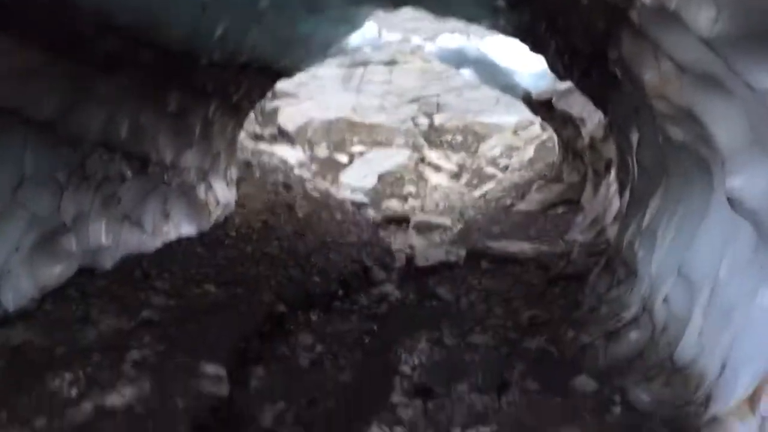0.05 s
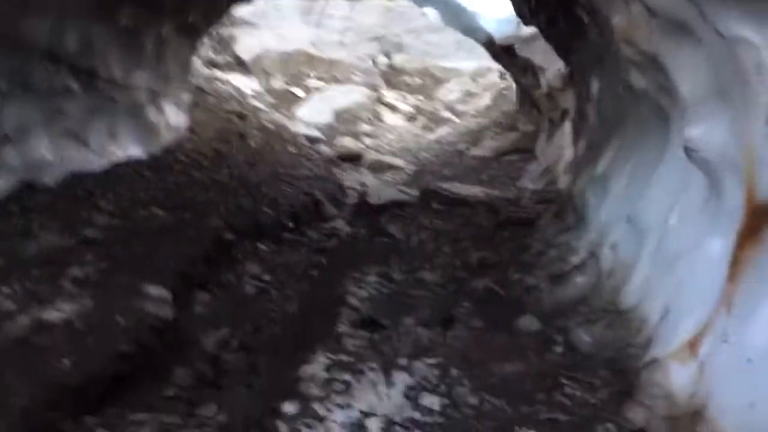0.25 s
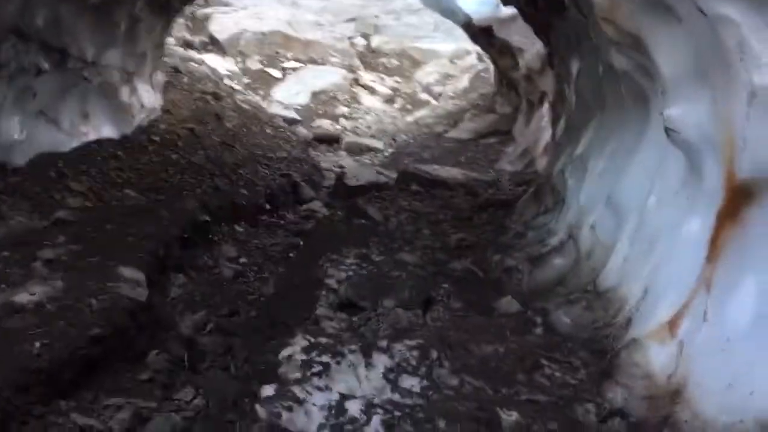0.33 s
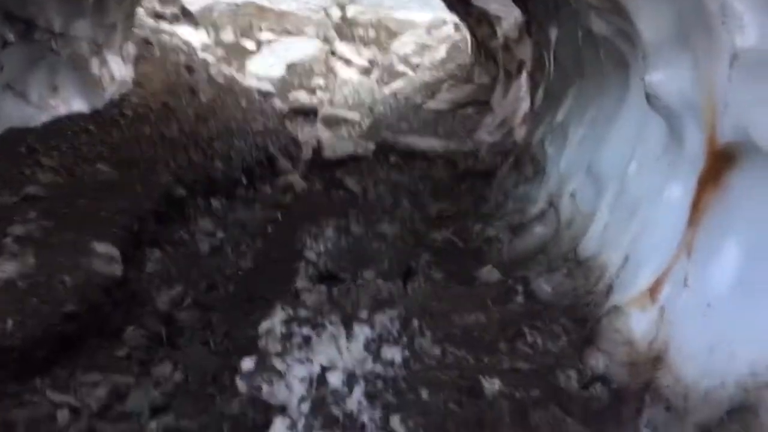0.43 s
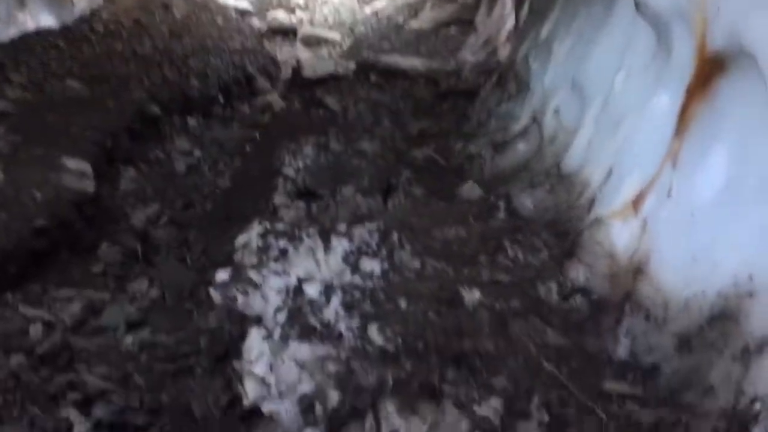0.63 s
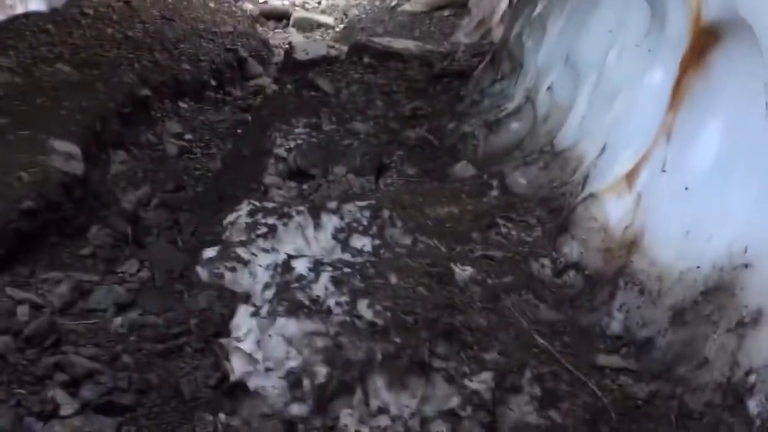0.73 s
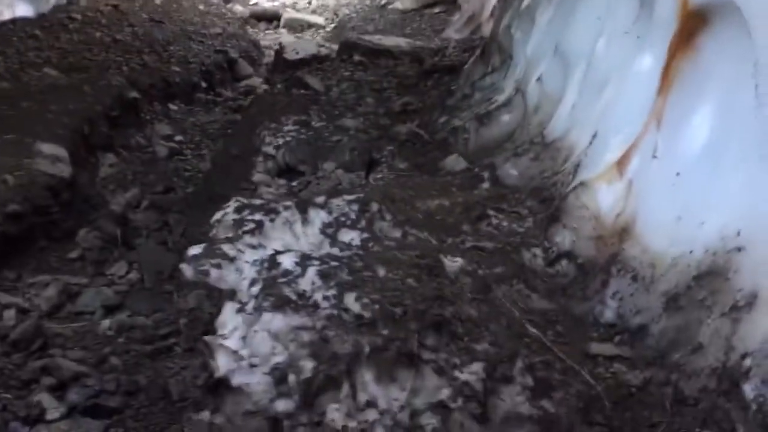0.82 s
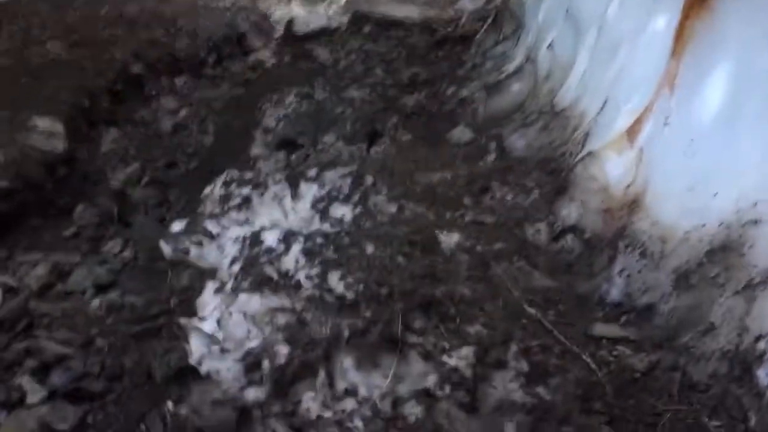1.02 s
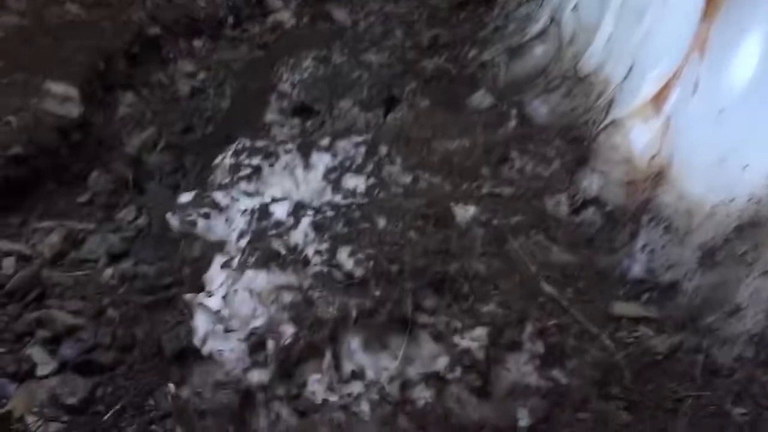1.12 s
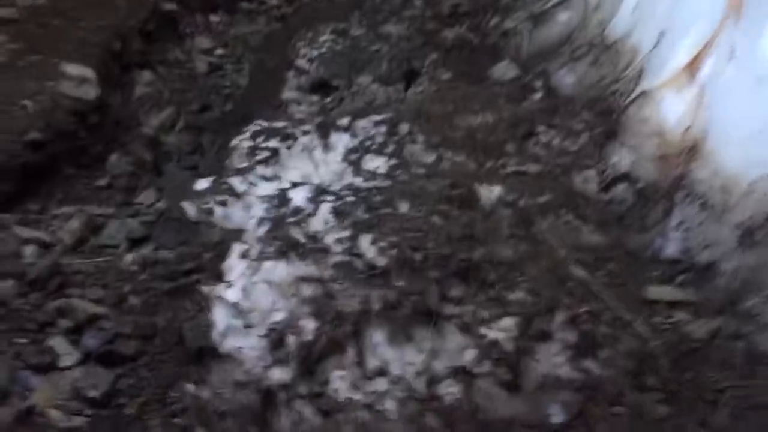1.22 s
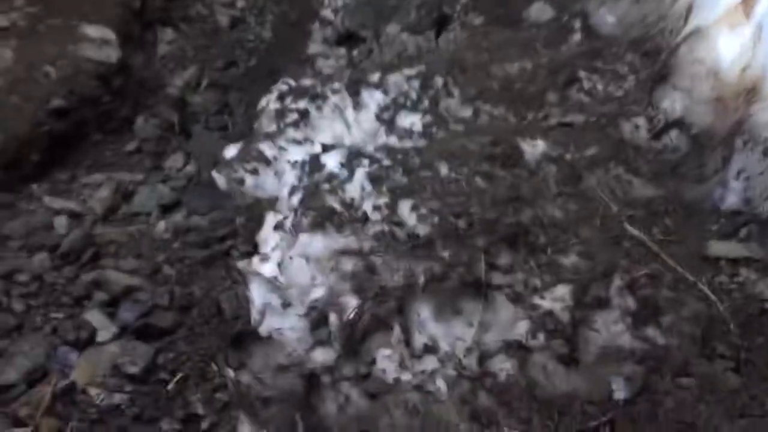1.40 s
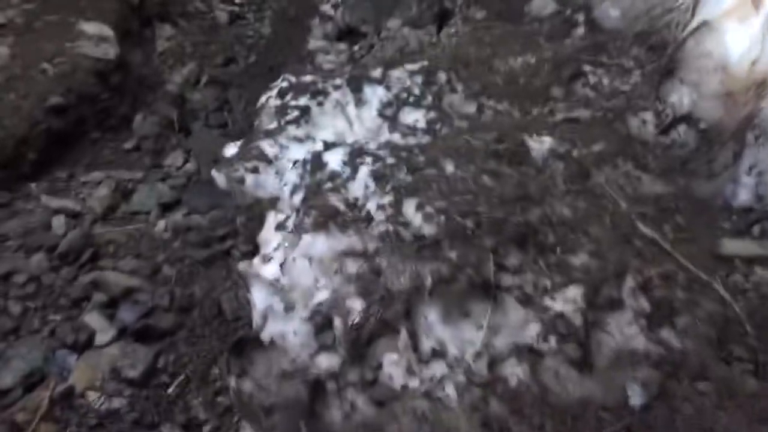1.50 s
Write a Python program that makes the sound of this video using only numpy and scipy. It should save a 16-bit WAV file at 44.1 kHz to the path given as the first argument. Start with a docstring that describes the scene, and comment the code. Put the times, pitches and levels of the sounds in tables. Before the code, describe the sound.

Meltwater dripping and splashing in a cave as boots step twice on wet gravel.

```python
"""Drips and steps in an ice cave

Meltwater drips onto gravel: each drop traps a bubble that pings, and throws a little spray.
In two steps, boots set the ground thudding and crunch the gravel; one stone knocks on another.
The ice walls reverberate briefly, over far drips, a wash of trickling water and a faint hollow tone."""
import sys
import numpy as np
from scipy import signal
from scipy.io import wavfile
from scipy.ndimage import uniform_filter1d

SR = 44100
rng = np.random.default_rng(int(sys.argv[2]) if len(sys.argv) > 2 else 0)


def digitize_waveform(pressure):
    """Quantize a signal to 16-bit integers and store it at the path in sys.argv[1].

    Rows of a 2-D input are taken as channels; values are limited to [-1, 1].
    """
    field = np.atleast_2d(pressure).T
    bounded = np.clip(field, -1, 1)
    quanta = np.round(bounded * 32767).astype(np.int16)
    wavfile.write(sys.argv[1], SR, quanta)


N = 68355

# near drops: (time [s], level [dB], ping pitch [Hz], ping gain [dB], spray gain [dB],
# ping decay [s], spray decay [s])
NEAR_DROPS = [(0.0034, -47.5, 3280, -6, -4, 0.0016, 0.00095),
              (0.0152, -56, 4560, 9.5, -5.5, 0.0012, 0.0012),
              (0.0628, -35.5, 6360, -12, -12, 0.0009, 0.0013), (0.0653, -40, 13900, 0, -18, 0.0009, 0.0017),
              (0.1587, -44, 14000, 1, 2.5, 0.00099, 0.00053), (0.182, -41, 2490, -9.5, -2, 0.0025, 0.0014),
              (0.2704, -25, 4030, -3.5, -18.5, 0.0016, 0.0029),
              (0.5046, -38, 8500, -1, -14, 0.00083, 0.0012), (0.5356, -34.5, 2740, 0, -12, 0.00062, 0.0016),
              (0.5488, -26.5, 3470, 2.5, -10.5, 0.00035, 0.0025),
              (0.5708, -43, 7200, -11, -3, 0.0008, 0.0024),
              (0.5923, -18.5, 8530, -3.5, -13.5, 0.00059, 0.0014),
              (0.6066, -25, 6040, -4, -12.5, 0.00037, 0.0024),
              (0.7132, -37, 13300, -7, -9, 0.00067, 0.0014),
              (0.7193, -36.5, 3710, -7.5, -4, 0.0027, 0.0013), (0.754, -53, 4670, -15, 5, 0.00083, 0.0013),
              (0.7776, -30, 6940, 5, -13, 0.00056, 0.0023), (0.8653, -39.5, 5700, -5, -1, 0.0012, 0.00072),
              (0.9675, -28.5, 2340, -4, -6.5, 0.0013, 0.0018),
              (1.0215, -28.5, 5560, 1.5, -11, 0.00048, 0.0018),
              (1.082, -35, 3780, -3, -8.5, 0.0009, 0.0019), (1.0923, -34.5, 5900, -3, -10, 0.001, 0.0022),
              (1.1205, -42.5, 2890, -14, -8, 0.00058, 0.0044),
              (1.1586, -32.5, 8600, -1, -21.5, 0.00044, 0.0034),
              (1.1906, -36.5, 4050, -7, -9, 0.0027, 0.0035), (1.1996, -32, 5620, -4, -7, 0.0016, 0.0033),
              (1.283, -30.5, 3730, -6.5, -10, 0.0027, 0.0024),
              (1.295, -27, 8170, -12, -10.5, 0.00052, 0.002), (1.3243, -35, 3650, -15, -5, 0.0006, 0.0014),
              (1.332, -29, 3250, -3, -14, 0.00068, 0.0014), (1.337, -33, 3500, -1.5, -9, 0.00052, 0.0015),
              (1.3973, -44, 12300, 3, 0.5, 0.00098, 0.0019),
              (1.4187, -33.5, 2580, -5.5, -4.5, 0.0009, 0.0014),
              (1.4257, -31, 12950, -0.5, -16, 0.0006, 0.0022),
              (1.4506, -32.5, 8850, -1, -5.5, 0.00076, 0.0016),
              (1.5097, -29, 4040, -4, -5.5, 0.001, 0.0017)]
# spray spectrum: (frequency [Hz], level [dB])
SPRAY_SPECTRUM = [(200, -10), (1200, -18), (2200, -5.5), (4000, 4.5), (6000, 5.5), (8500, 4), (10500, 1),
                  (13500, 1), (16000, 1)]
# boot impacts: (time [s], level [dB], pitch [Hz], decay [s], upper mode gain [dB], boom gain [dB])
BOOT_IMPACTS = [(.198, -27.5, 181, 0.0071, -6.5, -31), (.229, -36, 126, 0.0089, -2.5, -32),
                (.252, -30.5, 140, 0.014, -9.5, -40), (.281, -36.5, 128, 0.019, -21, -32),
                (0.347, -33.5, 186.7, 0.029, -8, -19), (.368, -40.5, 193.2, 0.02, -2, -2.5),
                (0.892, -41, 198.7, 0.03, -6.5, -1), (1.147, -54, 112, 0.024, -14, -0.5)]
# gravel crushed: (time [s], level [dB], rise [s], decay [s], tilt [dB/octave], cutoff [Hz])
GRAVEL_CRUSHES = [(0.191, -47.5, 0.005, 0.0056, 0, 4960), (.245, -47.5, 0.01, 0.058, -5.5, 5000),
                  (.35, -38.5, 0.0096, 0.019, -2.5, 3550), (.368, -33.5, 0.0031, 0.034, -1.5, 5960),
                  (.892, -28.5, 0.0034, .016, -1, 16000), (.932, -40.5, 0.0077, 0.022, -0.5, 14000),
                  (1.334, -44, 0.0013, 0.022, 5.5, 7600)]
# wet gravel spectrum: (frequency [Hz], level [dB])
GRAVEL_SPECTRUM = [(40, -11), (190, 2.5), (280, 2.5), (400, -4.5), (520, 0.5), (760, -6), (1080, 0.5),
                   (1350, 0), (1700, -0.5), (2300, -0.5), (4000, -3.5), (6500, -6), (10000, -11),
                   (16000, -15)]
# a stone clack, then a late, low drip-like ping: (time [s], level [dB], pitch [ratio], echo gain [dB])
CLACK_AND_PING = [(.3645, -11, 0.96, -1.5), (1.513, -35, 0.592, -11.5)]
# modes of both at a pitch ratio of one: (frequency [Hz], level [dB], t60 [s])
CLACK_AND_PING_MODES = [(2480, -6, 0.0047), (3450, -12, 0.009), (3860, 7, 0.0024), (5750, -19, 0.009)]
# grit shifting under the sole: (time [s], level [dB])
GRIT_LEVEL = [(0, -69.5), (0.751, -76.5), (.95, -56), (1.08, -56.5), (1.2, -56), (1.3, -57), (1.4, -64.5),
              (1.55, -68)]
# grit spectrum: (frequency [Hz], level [dB])
GRIT_SPECTRUM = [(40, -24), (180, 6), (450, -4), (900, -1.5), (1900, 6.5), (2900, -2.5), (4300, -1),
                 (7000, -25), (16000, -34)]
# envelope of the far drops: (time [s], gain [dB])
FAR_GAIN = [(0, -3.5), (.05, -6), (0.091, -20.5), (.15, -10), (.18, -5), (0.301, 6.5), (.4, 4), (.56, 0.5),
            (.67, -7), (.83, -11), (1.1, -2.5), (1.251, -8), (1.36, -8.5), (1.45, -6), (1.55, -18)]
# trickling water spectrum: (frequency [Hz], level [dB])
WATER_SPECTRUM = [(25, 8), (60, 7.5), (160, 5.5), (320, 5.5), (500, -1), (1000, -0.5), (2000, -6.5),
                  (4500, -9), (8000, -9.5), (16000, -7.5)]
# hollow tone: (time [s], pitch [Hz], level [dB])
HOLLOW_TONE = [(.62, 331.4, -102), (.69, 331.7, -65), (.75, 310.4, -78), (0.801, 322.7, -56),
               (.85, 248, -73), (.9, 226, -55)]
# reverberation time: (frequency [Hz], t60 [s])
ECHO_T60 = [(60, 0.82), (250, .48), (700, 0.42), (1800, 0.53), (4500, 0.314), (8000, 0.36), (15000, 0.46)]
# echo spectrum: (frequency [Hz], level [dB])
ECHO_SPECTRUM = [(40, 0), (120, 2), (250, -8), (450, 2), (1500, -5), (4000, 0), (8000, -4), (15000, -5)]
# resonances of the cave air: (frequency [Hz], level [dB], t60 [s])
AIR_MODES = [(146, -63, 0.35), (186, -62, 0.53), (295, -64, 0.22), (346, -55.5, .5)]


def drips():
    """Drop impact: each near drop excites a bubble, a spit of spray and a spatter falling back."""
    pings, sprays, t = np.zeros(N), np.zeros(N), seconds(3000)
    ping_delay_s = 0.000897
    for start, db, hz, ping_db, spray_db, ping_decay, spray_decay in NEAR_DROPS:
        add(pings, start + ping_delay_s, amp(db + ping_db) * ping(hz, ping_decay, t))
        spit = grains(len(t), spread_db=8) * burst(t, 0.94 * spray_decay, spray_decay)
        spatter = amp(-13.5) * grains(len(t), spread_db=5) * burst(t, rise_s=0.0053, decay_s=0.006)
        add(sprays, start, amp(db + spray_db) * (spit + spatter))
    sprays = coloured(sprays, SPRAY_SPECTRUM)
    return pings + sprays + cave(amp(-10.5) * pings + amp(-6) * sprays)


def ping(hz, decay_s, t):
    """Bubble resonance: trapped air rings as a damped oscillator, gliding slightly upwards."""
    phase = 2 * np.pi * hz * t * (1 + 1.5 * t)
    return burst(t, rise_s=0.00018, decay_s=decay_s) * np.sin(phase)


def thuds():
    """Modal vibration: the ground under a boot rings in two damped modes, over a slower deep boom."""
    out, t = np.zeros(N), seconds(12000)
    rise_s, upper_ratio, boom_hz = 0.0019, 1.597, 66
    for start, db, hz, decay, upper_db, boom_db in BOOT_IMPACTS:
        body = burst(t, rise_s, decay) * np.sin(2 * np.pi * hz * t)
        upper = burst(t, rise_s, decay_s=0.015) * np.sin(2 * np.pi * upper_ratio * hz * t)
        boom = burst(t, rise_s=0.028, decay_s=0.0069) * np.sin(2 * np.pi * boom_hz * t)
        add(out, start, amp(db) * (body + amp(upper_db) * upper + amp(boom_db) * boom))
    return out


def crunches():
    """Granular noise: wet gravel yields in a dense burst of contacts; the sole muffles the treble."""
    out, t = np.zeros(N), seconds(12000)
    for start, db, rise, decay, tilt, cutoff_hz in GRAVEL_CRUSHES:
        contacts = grains(len(t), spread_db=2.5) * burst(t, rise, decay)
        crush = coloured(contacts, GRAVEL_SPECTRUM, tilt)
        add(out, start, amp(db) * muffled(crush, cutoff_hz))
    return out


def clack_and_ping():
    """Damped modes: a stone clacks underfoot; the same modes, slowed, give a late, low drip-like ping."""
    direct, to_walls, t = np.zeros(N), np.zeros(N), seconds(1500)
    for start, db, ratio, echo_db in CLACK_AND_PING:
        scaled_time = t * ratio
        ringing = amp(db) * ring(CLACK_AND_PING_MODES, scaled_time) * onset(scaled_time, 0.00034)
        add(direct, start, ringing)
        add(to_walls, start, amp(echo_db) * ringing)
    return direct + cave(muffled(to_walls, cutoff_hz=6100))


def grit():
    """Friction noise: grit rustles as the weight rolls over the sole."""
    return coloured(grains(N, spread_db=2.15), GRIT_SPECTRUM) * amp(over_time(GRIT_LEVEL))


def cave(x):
    """Reverberation: close walls give strong early echoes, a tail dying by band and low air modes."""
    t = seconds(32768)
    first_echo_s, early_db, early_decay_s = 0.0055, 5, 0.006
    reflections = rng.choice([-1., 1.], len(t)) * (rng.random(len(t)) < 0.25)
    hz, when, bands = signal.stft(reflections, SR, nperseg=256)
    bands = bands * amp(over_frequency(ECHO_SPECTRUM, hz))[:, None]
    bands *= np.exp(-np.log(1000) * when / over_frequency(ECHO_T60, hz)[:, None])
    tail = signal.istft(bands, SR, nperseg=256)[1][:len(t)]
    tail *= 1 + amp(early_db) * np.exp(-t / early_decay_s)
    response = tail / np.linalg.norm(tail) + ring(AIR_MODES, t)
    out = np.zeros(N)
    add(out, first_echo_s, signal.fftconvolve(x, response))
    return out


def far_drips():
    """Poisson process: small drops fall independently, deeper in the cave."""
    out, t = np.zeros(N), seconds(400)
    drops_per_s, spread_db = 160, 11
    pitches_hz = np.geomspace(3300, 14500, num=24)
    for hz in pitches_hz:
        falls = rng.random(N) < drops_per_s / len(pitches_hz) / SR
        strength = amp(spread_db * np.minimum(rng.exponential(1, N), 2))
        spit = rng.standard_normal(len(t)) * burst(t, rise_s=0.0013, decay_s=0.0016)
        drop = 0.5 * ping(hz, decay_s=0.0015, t=t) + coloured(spit, SPRAY_SPECTRUM)
        out += signal.oaconvolve(falls * strength, drop)[:N]
    return unit_rms(out) * amp(-57.5 + over_time(FAR_GAIN))


def trickle():
    """Amplitude modulation: the broadband noise of distant running water swells slightly."""
    t, rates_hz = seconds(N), np.geomspace(1, 25, num=20)
    swell = sum(np.sin(2 * np.pi * (hz * t + rng.random())) / np.sqrt(hz) for hz in rates_hz)
    return coloured(rng.standard_normal(N), WATER_SPECTRUM) * amp(-67 + 0.5 * unit_rms(swell))


def hollow_tone():
    """Phase modulation: a faint hollow tone wavers as it swells and sinks between the steps."""
    times, hz, db = np.transpose(HOLLOW_TONE)
    t = seconds(N)
    slow_noise = uniform_filter1d(rng.standard_normal(N), size=700)
    waver = unit_rms(uniform_filter1d(slow_noise, size=700))
    phase = 2 * np.pi * np.cumsum(np.interp(t, times, hz)) / SR
    sounding = (t > times[0]) & (t < times[-1])
    return amp(np.interp(t, times, db)) * sounding * np.sin(phase + waver)


def grains(size, spread_db):
    """Granular noise: tiny bursts of random strength, eight samples each."""
    strength = amp(spread_db * np.minimum(rng.exponential(1, size // 8 + 1), 4))
    return unit_rms(rng.standard_normal(size) * np.repeat(strength, 8)[:size])


def ring(modes, t):
    """Free vibration: a sum of damped modes."""
    return sum(amp(db) * np.exp(-np.log(1000) * t / t60) * np.sin(2 * np.pi * hz * t)
               for hz, db, t60 in modes)


def onset(t, rise_s):
    """Sine-squared rise from zero to one."""
    return np.sin(np.pi / 2 * np.clip(t / rise_s, 0, 1)) ** 2


def burst(t, rise_s, decay_s):
    """Exponential decay after a smooth rise."""
    return onset(t, rise_s) * np.exp(-np.maximum(t - rise_s, 0) / decay_s)


def coloured(x, spectrum, tilt=0):
    """Minimum-phase filtering at unit energy, tilted in dB per octave above 300 Hz."""
    hz = abs(np.fft.fftfreq(4096, 1 / SR))
    log_gain = np.log(amp(over_frequency(spectrum, hz) + tilt * np.log2(np.maximum(hz, 300))))
    taps = np.fft.ifft(np.exp(np.conj(signal.hilbert(log_gain)))).real
    return signal.fftconvolve(x, taps / np.linalg.norm(taps))[:len(x)]


def muffled(x, cutoff_hz):
    """Steep low-pass filtering."""
    return signal.sosfilt(signal.butter(6, cutoff_hz, fs=SR, output="sos"), x)


def over_frequency(points, hz):
    """Interpolation on a log-frequency axis."""
    frequencies, values = np.transpose(points)
    return np.interp(np.log(hz + 1), np.log(frequencies + 1), values)


def over_time(points):
    """Linear interpolation across the scene."""
    return np.interp(seconds(N), *np.transpose(points))


def amp(db):
    """Decibels to amplitude ratio."""
    return 10 ** (np.asarray(db) / 20)


def unit_rms(x):
    """Normalisation to an rms of one."""
    return x / np.sqrt(np.mean(x ** 2) + 1e-20)


def seconds(size):
    """Uniformly sampled time axis."""
    return np.arange(size) / SR


def add(mix, start_s, sound):
    """Superposition of a delayed sound on the mix."""
    part = mix[round(start_s * SR):][:len(sound)]
    part += sound[:len(part)]


def scene():
    """Direct and reverberant fields: near drops and steps are in both, far drops only in the echo."""
    thud, crunch = thuds(), crunches()
    step_echo = cave(amp(-11.5) * thud + amp(-4) * crunch)
    near = thud + crunch + step_echo + clack_and_ping() + grit() + drips()
    return (near + cave(far_drips()) + trickle() + hollow_tone())[None]


def record(dry):
    """Band limiting: the microphone cuts the deepest bass, and a low-pass the highest treble."""
    low_hz, high_hz = 48, 15550
    low_cut = signal.butter(3, low_hz, btype="highpass", fs=SR, output="sos")
    high_cut = signal.firwin(401, high_hz, window=("kaiser", 8), fs=SR)
    return signal.oaconvolve(signal.sosfilt(low_cut, dry), high_cut[None], "same")


dry = scene()
out = record(dry)
digitize_waveform(out)
```